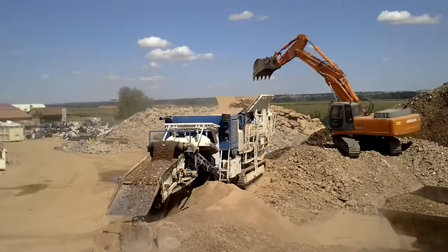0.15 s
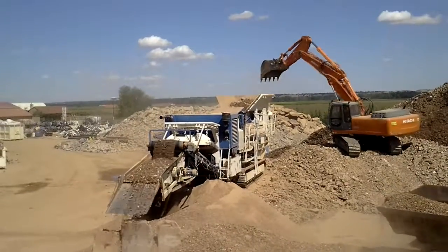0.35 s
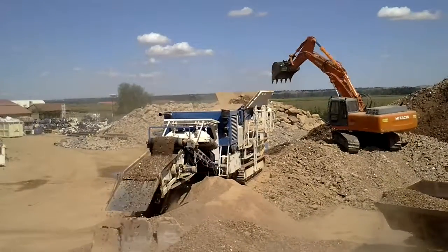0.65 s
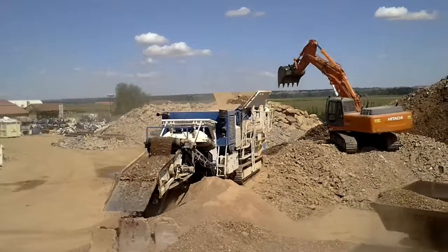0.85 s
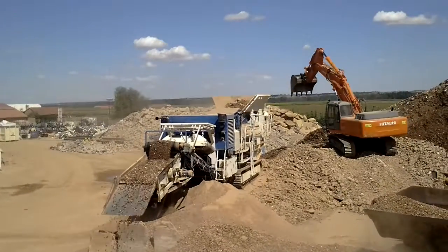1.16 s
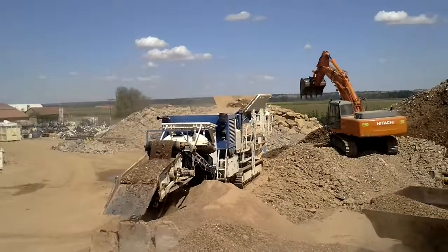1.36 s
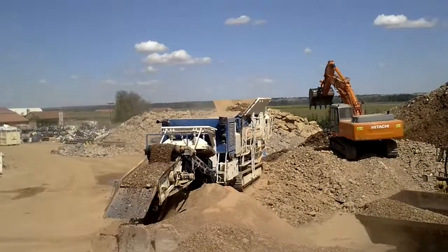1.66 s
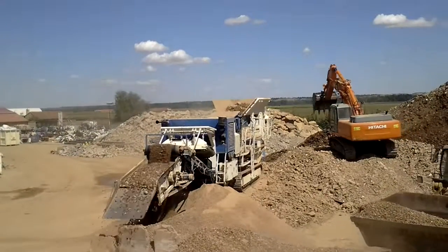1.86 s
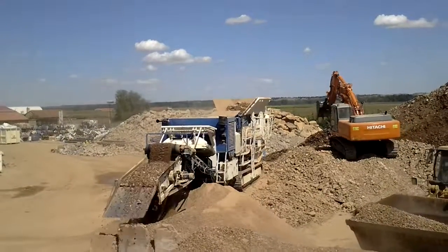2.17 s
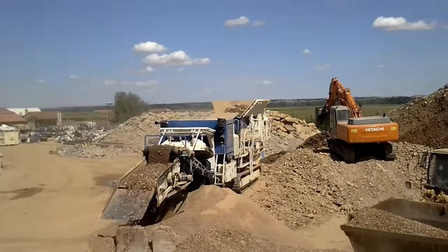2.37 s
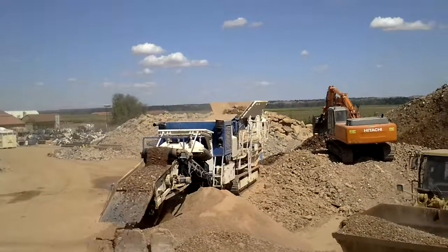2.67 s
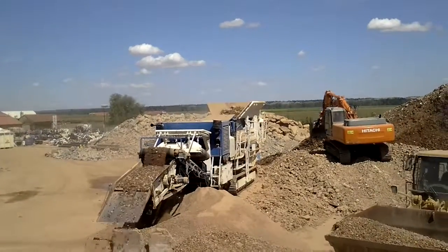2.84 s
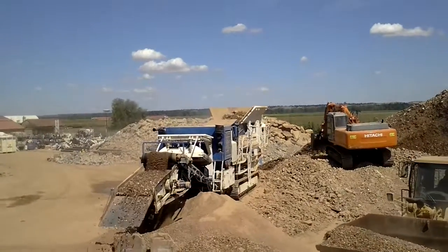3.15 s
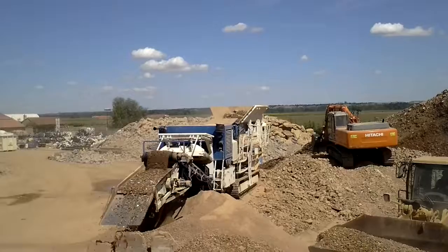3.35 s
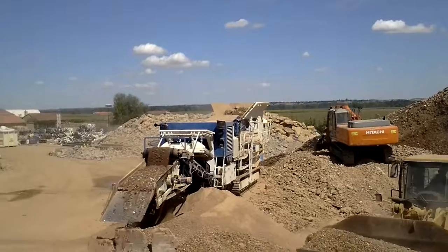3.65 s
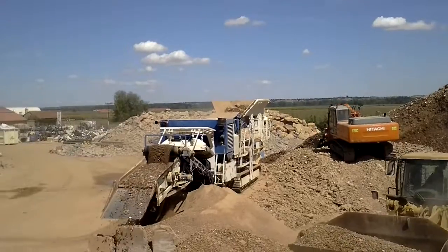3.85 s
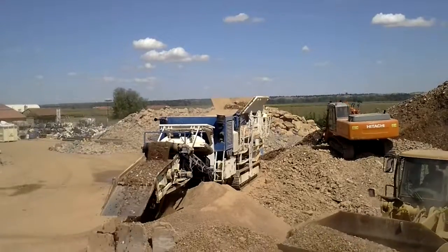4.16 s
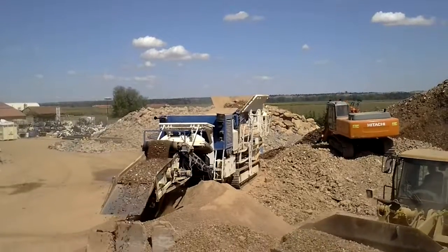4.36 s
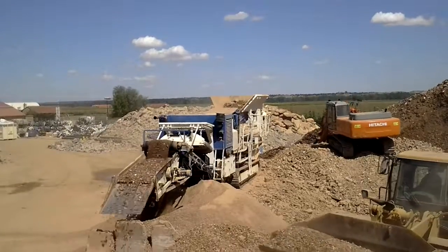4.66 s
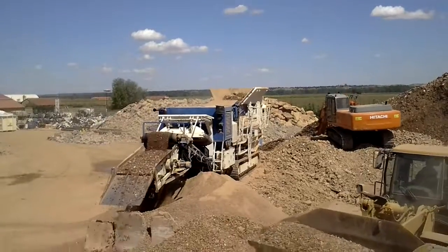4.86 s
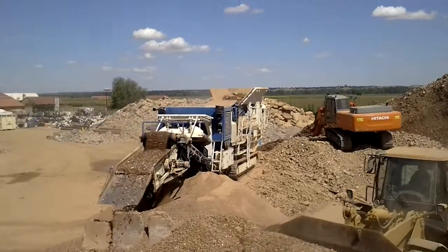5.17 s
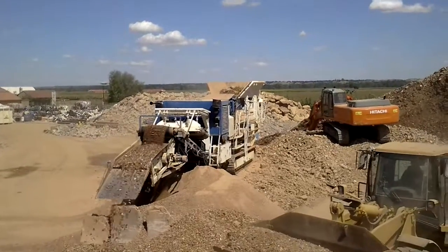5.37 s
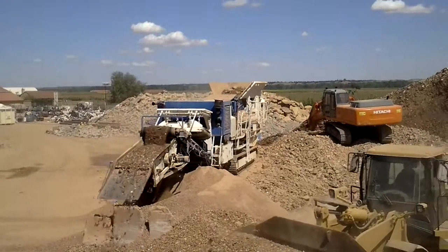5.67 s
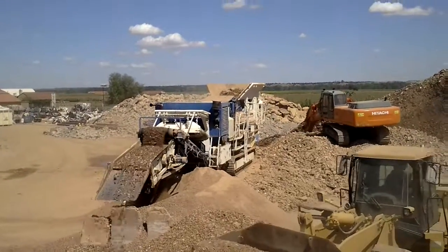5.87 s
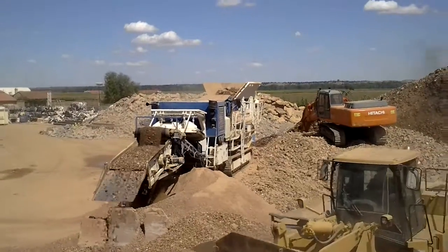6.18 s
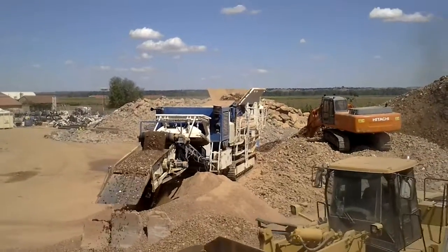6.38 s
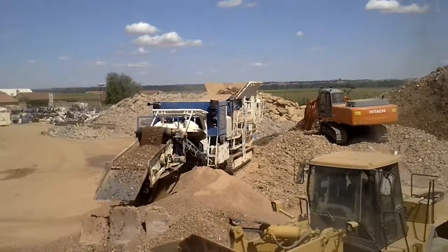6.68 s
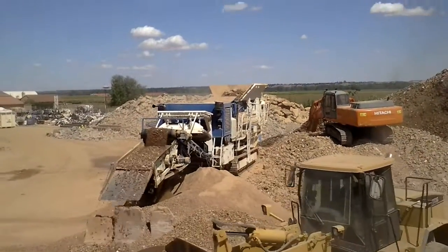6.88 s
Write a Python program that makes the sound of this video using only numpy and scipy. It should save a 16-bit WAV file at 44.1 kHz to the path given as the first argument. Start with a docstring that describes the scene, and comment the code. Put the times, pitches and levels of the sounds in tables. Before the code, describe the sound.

A rock crusher runs in an open yard, heard from some way off. Its diesel throbs, rubble booms in the steel chamber, and fans and an excavator's swing gear whine. Gravel rattles off the belt while stones scrape, clack and split, and grit slides in short rushes. Later the feed thins and a wheel loader's clatter grows. A few chips tick nearby, a last heavy spill pours, and the loader rolls up close.

```python
"""A tracked rock crusher works in an open yard, heard from a heap some way off. From the start its diesel
throbs, rubble booms in the steel chamber, fans, pumps and an excavator's swing gear whine, gravel rattles
off the belt and stone scrapes and clacks on steel. After a second, stones split and grit slides in short
rushes. Near 5 s the feed thins and a wheel loader's clatter grows; a few chips tick nearby, a last heavy
spill pours off the belt, and the loader rolls up close."""
import sys
import numpy as np
from scipy import signal
from scipy.fft import rfft, irfft
from scipy.io import wavfile
from scipy.ndimage import map_coordinates

SR = 44100
rng = np.random.default_rng(int(sys.argv[2]) if len(sys.argv) > 2 else 0)


def to_wav(sig):
    """Store sig (one row per channel, or 1-D mono) as 16-bit WAV at the path in sys.argv[1].

    Samples outside -1..1 are clipped; the rate is SR.
    """
    pcm = np.clip(np.atleast_2d(sig), -1, 1) * 32767
    pcm = np.round(pcm).astype(np.int16)
    wavfile.write(sys.argv[1], SR, pcm.T)  # frames by channels


N = 309582
TIME = np.arange(N) / SR
FEED_THINS_S = 4.79  # the feed of rubble is steady until then
# roar of the crushing chamber: (frequency [Hz], spectral density [dB])
ROAR_SPECTRUM = [(20, -44), (34, -13.5), (70, -16), (135, -15.5), (185, -6), (245, -6), (350, 0), (440, -3),
                 (490, -9), (550, -7.5), (630, -4), (745, 1.5), (905, -8), (1550, -9), (2000, -23.5),
                 (7000, -82.5)]


def gain_of(db):
    """Converts decibels to an amplitude ratio."""
    return 10 ** (np.asarray(db) / 20)


def unit_rms(x):
    """Normalises a signal to unit power."""
    return x / np.sqrt(np.mean(x ** 2) + 1e-20)


def curve(rows):
    """Linear interpolation of (time [s], value) rows."""
    return np.interp(TIME, *np.transpose(rows))


def coloured(x, spectrum):
    """Spectral shaping by (frequency [Hz], gain [dB]) rows, cut off at SR / 4, to unit power."""
    hz, db = np.transpose(spectrum)
    bins = np.fft.rfftfreq(len(x), 1 / SR)
    response = gain_of(np.interp(np.log(bins + 1), np.log(hz), db)) * (bins < SR / 4)
    return unit_rms(irfft(rfft(x) * response, len(x)))


def wander(rate):
    """Smooth random modulation of about unit size, with rate new values a second."""
    knots, coarse = rng.standard_normal(4096), TIME[::32]
    return np.interp(TIME, coarse, map_coordinates(knots, [coarse * rate], order=3, mode="wrap"))


def tone(turns, db, fade_db):
    """Scintillation: warm, moving air makes a partial's level and phase drift."""
    fading = gain_of(fade_db * wander(3.0))
    return gain_of(db) * unit_rms(fading * np.cos(2 * np.pi * turns + 0.28 * wander(2.435)))


def impacts(per_s, spread_db):
    """A Poisson train of blows with exponentially distributed levels."""
    size = gain_of(spread_db * np.minimum(rng.exponential(1, N), 4))
    return size * rng.choice([-1, 1], N) * (rng.random(N) < per_s / SR)


def add(mix, s, sound):
    """Superposes a sound on the mix at time s."""
    part = mix[max(round(s * SR), 0):][:len(sound)]
    part += sound[:len(part)]


def release(start_s, db_per_s):
    """Unit gain until start_s, then exponential decay."""
    return gain_of(-db_per_s * np.maximum(TIME - start_s, 0))


def swell(s, db, half_s):
    """A Lorentzian envelope: db at time s, half the amplitude half_s to either side."""
    return gain_of(db) / (1 + ((TIME - s) / half_s) ** 2)


def swells(rows, steady=0):
    """Incoherent addition: swells and a steady gain sum in power."""
    return np.sqrt(steady ** 2 + sum(swell(*row) ** 2 for row in rows))


def diesel(cycles, hum_order=14, drone_order=55, scatter_turns=0.11, bite_half_s=0.041):
    """Periodic firing gives harmonics of the cycle rate; one of them surges as the jaw bites."""
    # engine harmonics: (order [multiple of the cycle rate], level [dB])
    harmonics = [(12, -50), (13, -47.5), (15, -52), (16, -47), (19, -54.5), (20, -49.5), (22, -46.5),
                 (23, -47.5), (24, -37), (25, -47.5), (26, -37), (27, -37.5), (28, -38), (29, -47.5),
                 (30, -42.5), (31, -48), (33, -51.5), (34, -43.5), (36, -47), (37, -52.5), (39, -51),
                 (40, -48), (42, -47.5), (43, -46.5), (44, -42.5), (46, -44), (47, -42.5), (48, -49.5),
                 (50, -48.5), (52, -45.5), (53, -42.5)]
    # course of the low hum: (time [s], level [dB])
    hum_levels = [(0, -39.5), (1, -43.5), (1.45, -35), (1.75, -45), (2.6, -35.5), (3.3, -38.5),
                  (3.7, -35.5), (4.4, -36.5), (4.65, -33), (5, -38.5), (5.8, -33.5), (6.05, -39.5),
                  (7.02, -34.5)]
    # bites of the jaw, about three a second: (time [s], level [dB])
    bites = [(.27, -28.5), (.55, -27.5), (.97, -26.5), (1.311, -32), (1.61, -24), (1.9, -23), (2.28, -27),
             (2.66, -22.5), (3.08, -30.5), (3.33, -26), (3.87, -30), (4.44, -25.5), (4.68, -27.5),
             (4.95, -25.5), (5.18, -35), (5.35, -26), (5.6, -24), (5.76, -28), (6.07, -26)]
    orders = np.zeros(N)
    for order, db in harmonics:
        # odd orders lie a quarter turn from even ones, so both shaft turns of a cycle throb alike
        phase = round(order) % 2 / 4 + scatter_turns * rng.standard_normal()
        orders += tone(round(order) * cycles + phase, db, fade_db=0.5)
    hum = gain_of(curve(hum_levels)) * unit_rms(np.cos(2 * np.pi * hum_order * cycles))
    shudder = unit_rms(1 + 0.067 * wander(38))  # no two firings are equally strong
    load = swells([(s, db, bite_half_s) for s, db in bites], steady=gain_of(-34))
    drone = load * shudder * unit_rms(np.cos(2 * np.pi * drone_order * cycles))
    one_cycle = rng.standard_normal(1200)  # repeated noise has a fine comb spectrum
    clatter = map_coordinates(one_cycle, [cycles % 1 * len(one_cycle)], order=1, mode="wrap")
    return orders + hum + drone + gain_of(-34) * coloured(clatter, ROAR_SPECTRUM)


def chamber(cycles, throb=0.055, roar_db=-23.5, tumble_db=-30, damping_s=0.02):
    """Rubble grinds in time with the shaft, and its impacts excite damped modes of the steel walls."""
    # wall modes: (frequency [Hz], relative level [dB], time to fall 60 dB [s])
    wall_modes = [(180.2, -8, 0.13), (263, -10, 0.049), (339.4, -1, 0.1), (370, -5.5, 0.038),
                  (432, -3, 0.12), (639, -1, .09), (725, -0.5, 0.12), (730, -5.5, .05), (781, -3.5, 0.12),
                  (850, -12.5, 0.05), (1289, -1, 0.067), (1500, -13.5, 0.028), (1666, -12, 0.1)]
    # big lumps breaking: (time [s], level [dB])
    lumps = [(0.27, -16), (.53, -16), (.945, -12.5), (.977, -12), (1.429, -17), (1.676, -16), (1.875, -23),
             (1.943, -11), (2.268, -13.5), (2.68, -26), (2.769, -12), (3.117, -23), (3.3, -13), (3.63, -10),
             (4.405, -20), (4.651, -20), (5.031, -13), (5.571, -11), (5.949, -12)]
    shaft = 1 + throb * np.cos(2 * np.pi * 2 * cycles)
    roar = gain_of(roar_db) * coloured(rng.standard_normal(N) * shaft, ROAR_SPECTRUM)
    t, tumble, knocks = TIME[:SR // 3], np.zeros(N), np.zeros(N)
    stones = impacts(per_s=160, spread_db=1.5)
    modes = np.array([gain_of(db - 60 * t / t60) * np.sin(2 * np.pi * hz * t)
                      for hz, db, t60 in wall_modes])
    for mode in modes:  # each stone lands on another spot and rings the modes in other shares
        tumble += signal.oaconvolve(stones * rng.standard_normal(N), mode)[:N]
    # a lump takes a moment to give way, and the load of rubble damps the walls
    envelope = (1 - np.exp(-t / 0.00056)) * np.exp(-t / damping_s)
    for s, db in lumps:
        ring = rng.choice([-1, 1], len(modes)) @ modes * envelope
        add(knocks, s, gain_of(db) * ring / abs(ring).max())
    radiation = signal.butter(4, 170, "highpass", fs=SR, output="sos")  # plates give off little bass
    return roar + signal.sosfilt(radiation, gain_of(tumble_db) * unit_rms(tumble) + knocks)


def whine(hz, db, waver=0.001034, waver_hz=2, fade_db=2.5):
    """Frequency modulation: a rotor's tone follows its wavering speed."""
    turns = hz * np.cumsum(1 + waver * wander(waver_hz)) / SR
    return tone(turns + rng.random(), db, fade_db)


def auxiliaries():
    """Rotating parts radiate tones: fans and pumps run on, swing gear and turbocharger fade."""
    # fans, pumps and gears: (frequency [Hz], level [dB])
    rotor_tones = [(35.7, -57), (225.8, -57), (296.2, -36), (362, -38.5), (654.4, -43), (703.2, -40.5),
                   (795, -38.5), (839, -46), (879.7, -49.5), (926, -45), (1137.9, -46), (1247.7, -43.5),
                   (1580, -48), (1849, -45)]
    # the excavator's swing gear: (frequency [Hz], level [dB])
    swing_tones = [(1285.8, -42.5), (1337.5, -39)]
    turbo = release(FEED_THINS_S, 4.5) * whine(2612, -43.5, waver=0.006, waver_hz=14, fade_db=3.0)
    rotors = sum(whine(*row) for row in rotor_tones)
    swing = release(start_s=2.8, db_per_s=3.5) * sum(whine(*row) for row in swing_tones)
    return rotors + turbo + swing


def steel(force, spacing_hz, width_hz, lowest_hz=1500, count=120, spots_per_s=5):
    """Modal response of a large plate: stones drift between spots that excite different modes."""
    t, out = TIME[:SR // 7], np.zeros(N)
    shares = np.array([wander(spots_per_s) for spot in range(4)])
    for share in shares / np.linalg.norm(shares, axis=0):  # the total power stays even
        hz = lowest_hz + spacing_hz * (np.arange(count) + rng.uniform(-.3, .3, count))
        modes = np.sin(2 * np.pi * (hz[:, None] * t + rng.random((count, 1)))).sum(0)
        out += signal.oaconvolve(force * share, modes * np.exp(-np.pi * width_hz * t))[:N]
    return unit_rms(out)


def gravel(flow_db=-28.5, flicker_db=1.2, sand_db=-48):
    """Dense impacts merge into noise: stone pours off the belt and sand sifts through the screen."""
    # heavier spills: (time [s], level [dB], half width [s])
    spills = [(.42, -31, 0.17), (.89, -27.5, 0.052), (1.55, -39, 0.12), (2.6, -36, 0.13), (4.85, -34, 0.93),
              (6.3, -24.5, 0.69)]
    # gravel on belt and heap: (frequency [Hz], spectral density [dB])
    gravel_spectrum = [(400, -35), (900, -14.5), (1500, 3), (1850, -7.5), (2350, -3.5), (2720, 0.5),
                       (3030, -4.5), (3350, 1.5), (4000, -1.5), (4300, -6), (4650, -10.5), (5350, -15),
                       (5700, -18), (6900, -28), (7150, -69.5)]
    # sifting sand: (frequency [Hz], spectral density [dB])
    sand_spectrum = [(3000, -47), (4700, -0.5), (5400, 6), (5620, -11.5), (6100, -8), (6950, -8.5),
                     (7200, -61)]
    ticks = unit_rms(impacts(per_s=1800, spread_db=3.5)) + rng.standard_normal(N)
    ringing = steel(rng.standard_normal(N), spacing_hz=41, width_hz=11)
    flow = swells(spills, steady=gain_of(flow_db)) * release(FEED_THINS_S, 2.5)
    stones = flow * gain_of(flicker_db * wander(45)) * coloured(ticks + ringing, gravel_spectrum)
    sand = gain_of(sand_db) * coloured(rng.standard_normal(N), sand_spectrum)
    return stones + release(FEED_THINS_S, 2) * sand


def chute():
    """Random excitation: small stones keep a steel chute's resonances ringing until the feed thins."""
    # chute modes: (frequency [Hz], bandwidth [Hz], level [dB])
    chute_modes = [(2160, 22, -56), (2564, 22, -46), (2602, 13, -44.5), (2790, 32, -51), (3430, 28, -51),
                   (3540, 11, -49), (3720, 8.9, -56), (4050, 13, -54.5), (4010, 7.3, -47),
                   (5250, 40, -67.5)]
    t, out = TIME[:SR // 10], np.zeros(N)
    for hz, width, db in chute_modes:
        mode = np.exp(-np.pi * width * t) * np.sin(2 * np.pi * hz * t)
        out += gain_of(db) * unit_rms(signal.oaconvolve(impacts(per_s=300, spread_db=1.5), mode)[:N])
    return release(FEED_THINS_S, db_per_s=21.5) * out


def loader(firing_hz=52.7, throb=0.15, idle_db=-60.5, drive_hz=522):
    """Firings amplitude-modulate clatter and exhaust; engine bay and drive swell as the loader nears."""
    # course of the combustion clatter: (time [s], level [dB])
    clatter_levels = [(0, -34), (3.2, -38), (4.8, -29.5), (7.02, -29.5)]
    # its colour: (frequency [Hz], spectral density [dB])
    clatter_spectrum = [(200, -19), (520, 1.5), (700, -12.5), (950, 4.5), (1300, -7.5), (1600, 1),
                        (1850, -1), (2150, -0.5), (2470, -10.5), (2680, 4), (2950, -2), (3300, -6),
                        (7000, -70)]
    # pushes of the throttle: (time [s], level [dB], half width [s])
    throttle = [(1.45, -46, 0.26), (3, -45, 0.56), (5.4, -41.5, .4), (6.98, -44.5, 0.13)]
    # exhaust rumble: (frequency [Hz], spectral density [dB])
    exhaust_spectrum = [(30, -22.5), (52, 3.5), (70, -1), (95, -3.5), (140, -14.5), (600, -68),
                        (3000, -120)]
    # roar of the engine bay: (frequency [Hz], spectral density [dB])
    bay_spectrum = [(60, -34), (110, -9), (170, -15), (260, -5), (430, 1), (600, -16.5), (830, -1),
                    (1250, -24.5), (1800, -10.5), (2600, -38), (7000, -78.5)]
    puffs = rng.standard_normal(N) * (1 + throb * np.cos(2 * np.pi * firing_hz * TIME))
    clatter = gain_of(curve(clatter_levels)) * coloured(puffs, clatter_spectrum)
    rumble = swells(throttle, steady=gain_of(idle_db)) * coloured(puffs, exhaust_spectrum)
    bay = coloured(rng.standard_normal(N), bay_spectrum)
    drive = tone(drive_hz * TIME, -13.5, fade_db=5.5)  # level relative to the bay
    return clatter + rumble + swell(s=7.03, db=-25, half_s=0.85) * (bay + drive)


def scraping(catch_db=0.7, catch_hz=45, rasp=1.5):
    """Stick-slip friction: countless tiny slips of stone rasp and set a steel plate sizzling."""
    # stones dragging: (time [s], level [dB], half width [s])
    drags = [(.1, -31, 0.45), (1.53, -30, 0.33), (3.3, -31.5, 0.18), (4.22, -37.5, .1), (6.14, -28, 0.089),
             (6.7, -31.5, 0.95)]
    # stone on steel: (frequency [Hz], spectral density [dB])
    scrape_spectrum = [(2000, -69), (3750, -9.5), (4000, 4), (4120, 5.5), (4280, -1.5), (4550, -8.5),
                       (5000, -24.5), (6500, -35), (7200, -78)]
    slips = unit_rms(impacts(per_s=3000, spread_db=0))
    plate = steel(slips, spacing_hz=44, width_hz=34)
    catching = unit_rms(gain_of(catch_db * wander(catch_hz)))
    return swells(drags) * catching * coloured(plate + rasp * slips, scrape_spectrum)


def clacks(ring_s=0.0057, rise_s=0.0029):
    """Contact damping: a stone excites a cluster of plate modes and stills them at once."""
    # skittering stones: (time [s], centre frequency [Hz], peak level [dB])
    strikes = [(.112, 4010, -24), (.359, 3460, -23), (1.493, 4090, -24), (3.049, 3784, -26),
               (3.254, 3811, -25), (3.401, 4130, -22), (4.182, 3930, -21), (4.97, 4020, -26),
               (5.687, 3860, -18), (6.008, 4000, -18), (6.082, 4060, -28), (6.618, 4040, -14.5),
               (6.678, 3670, -18)]
    t, out = TIME[:SR // 4], np.zeros(N)
    envelope = (1 - np.exp(-t / rise_s)) * np.exp(-t / ring_s)
    for s, hz, db in strikes:
        cluster = hz * (1 + .03 * rng.standard_normal(size=(14, 1)))
        ring = envelope * np.sin(2 * np.pi * (cluster * t + rng.random(cluster.shape))).sum(0)
        add(out, s, gain_of(db) * ring / abs(ring).max())
    return out


def cracks(width_octaves=0.42, rise_s=0.003, spread_db=3, air_hz=5530):
    """Brittle fracture: a stone splits in a burst of tiny breaks; smaller stones sound higher."""
    # stones splitting: (time [s], centre frequency [Hz], level [dB], decay time [s])
    splits = [(1.125, 4500, -28, 0.013), (1.791, 2900, -24, 0.019), (2.354, 4700, -31, 0.022),
              (2.931, 4100, -26, 0.013), (3.304, 4800, -38, .012), (3.971, 2600, -28, 0.012),
              (6.146, 4700, -34, .016), (6.185, 4460, -29, .03), (6.233, 2800, -25.5, .012),
              (6.678, 2810, -27, 0.015)]
    t, out = TIME[:SR // 10], np.zeros(N)
    bins = np.fft.rfftfreq(len(t), 1 / SR)
    air = 1 / np.sqrt(1 + (bins / air_hz) ** 20)  # absorption dulls the treble
    for s, hz, db, decay_s in splits:
        fractures = rng.standard_normal(len(t)) * gain_of(spread_db * rng.exponential(1, len(t)))
        body = np.exp(-.5 * (np.log2((bins + 1) / hz) / width_octaves) ** 2)
        envelope = np.minimum(t / rise_s, 1) * np.exp(-t / decay_s)
        add(out, s, gain_of(db) * envelope * unit_rms(irfft(rfft(fractures) * body * air, len(t))))
    return out


def grit():
    """Granular flow: the collisions of fine and coarse grains add up to short, soft rushes."""
    # slides: (time [s], level [dB], half width [s], coarse share of the power [0-1])
    slides = [(1.797, -30, .02, 0.5), (2.342, -26.5, 0.021, 0.9), (3.294, -33, 0.045, 0.5),
              (5.124, -37, .08, 0.06), (6.14, -29.5, 0.055, 0.2), (6.206, -26, 0.045, 0.06),
              (6.443, -31.5, 0.057, 0.5), (6.801, -35, 0.063, 0.1)]
    # fine grains: (frequency [Hz], spectral density [dB])
    fine_spectrum = [(1200, -26), (2300, -4), (2900, 4), (3600, -7), (4200, 10), (4800, 0.5), (5500, -13),
                     (6200, -15.5), (6900, -26), (7300, -75.5)]
    # coarse grains: (frequency [Hz], spectral density [dB])
    coarse_spectrum = [(600, -24.5), (1500, 1), (2100, -4.5), (2700, 5.5), (3500, -4.5), (4400, -10),
                       (5400, -7), (6900, -35), (7300, -75)]
    fine = coloured(impacts(per_s=3600, spread_db=3.5), fine_spectrum)
    coarse = coloured(impacts(per_s=3200, spread_db=-5.0), coarse_spectrum)
    return sum(swell(s, db, half_s) * (np.sqrt(1 - share) * fine + np.sqrt(share) * coarse)
               for s, db, half_s, share in slides)


def chips(decay_s=0.00064):
    """A brief impulse has a broad spectrum: chips land close by with dry ticks."""
    # landings: (time [s], peak level [dB], pitch [Hz])
    landings = [(5.941, -18.5, 6020), (5.955, -23, 6050), (6.492, -16.5, 4980)]
    # colour of a chip: (frequency [multiple of its pitch], spectral density [dB])
    chip_spectrum = [(.3, -26), (.8, 2), (1, 5.5), (1.1, -0.5), (1.25, -11), (1.5, -42.5)]
    out = np.zeros(N)
    for s, db, hz in landings:
        burst = rng.standard_normal(N) * np.exp(-abs(TIME - s) / decay_s)
        tick = coloured(burst, [(ratio * hz, level) for ratio, level in chip_spectrum])
        out += gain_of(db) * tick / abs(tick).max()
    return out


def scene():
    """Superposition: the pressures of all sources in the yard add at one point."""
    # diesel speed: (time [s], four-stroke cycle rate [Hz])
    engine_speed = [(0, 13.575), (1, 13.595), (2.1, 13.605), (3.5, 13.56), (4.9, 13.58), (6.4, 13.53),
                    (7.02, 13.54)]
    cycles = np.cumsum(curve(engine_speed)) / SR
    crusher = gain_of(0.19) * release(FEED_THINS_S, 0.9) * (diesel(cycles) + chamber(cycles))
    stone_flow = gravel() + chute() + scraping() + clacks() + cracks() + grit() + chips()
    return (crusher + stone_flow + auxiliaries() + loader())[None]


def record(dry, low_cut_hz=31, high_cut_hz=7607):
    """Band limiting: the deepest bass and the treble above about 7.6 kHz are cut off."""
    highpass = signal.butter(8, low_cut_hz, "highpass", fs=SR, output="sos")
    lowpass = signal.firwin(511, high_cut_hz, window=("kaiser", 9), fs=SR)
    return signal.oaconvolve(signal.sosfilt(highpass, dry), lowpass[None], "same")


dry = scene()
out = record(dry)
to_wav(out)
```